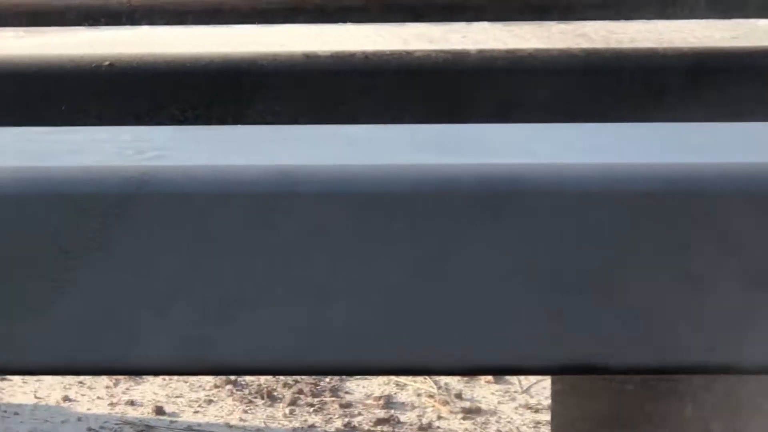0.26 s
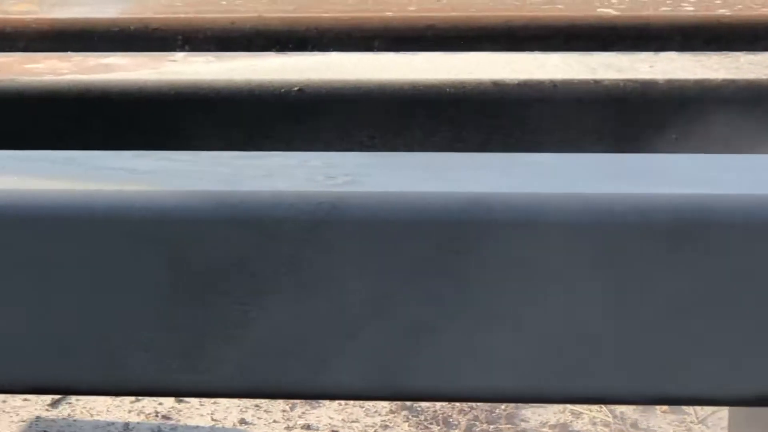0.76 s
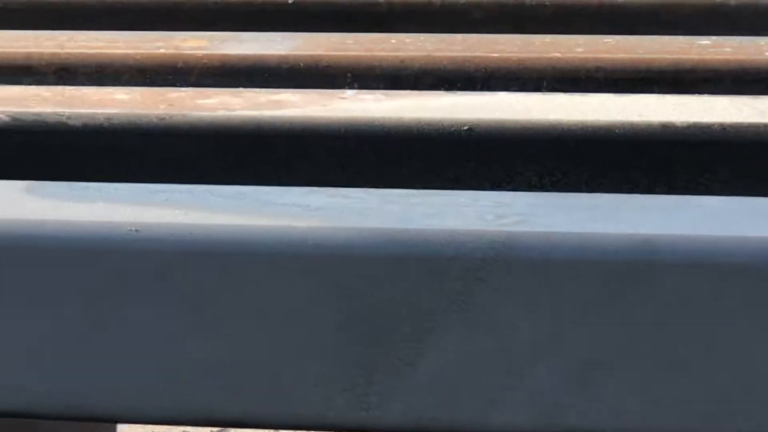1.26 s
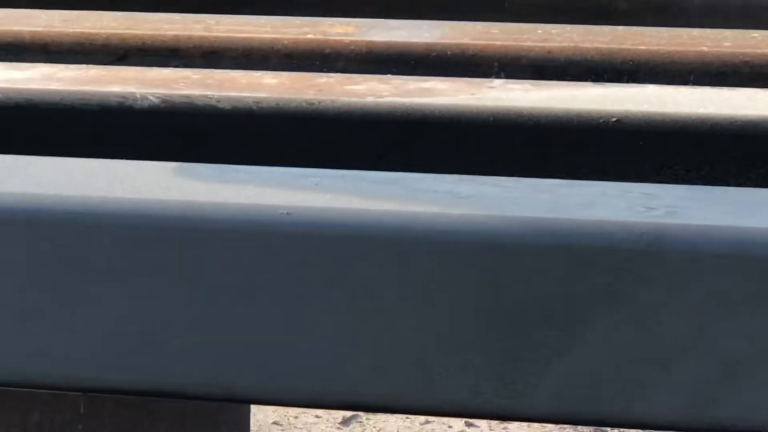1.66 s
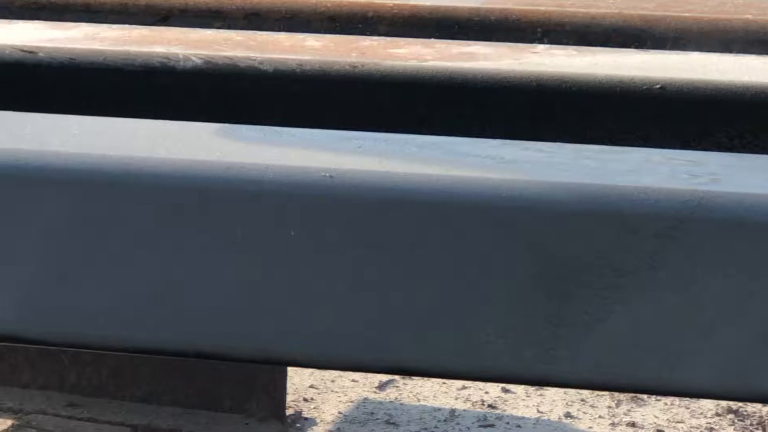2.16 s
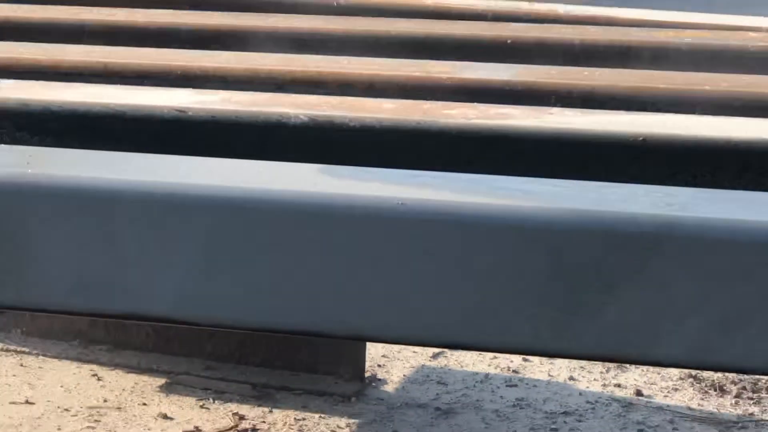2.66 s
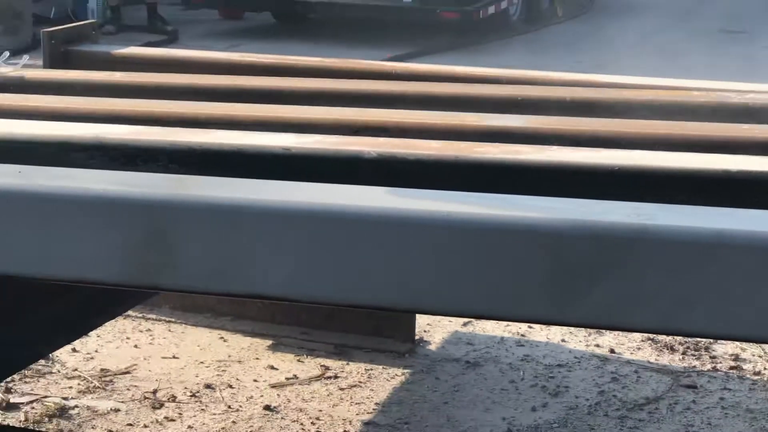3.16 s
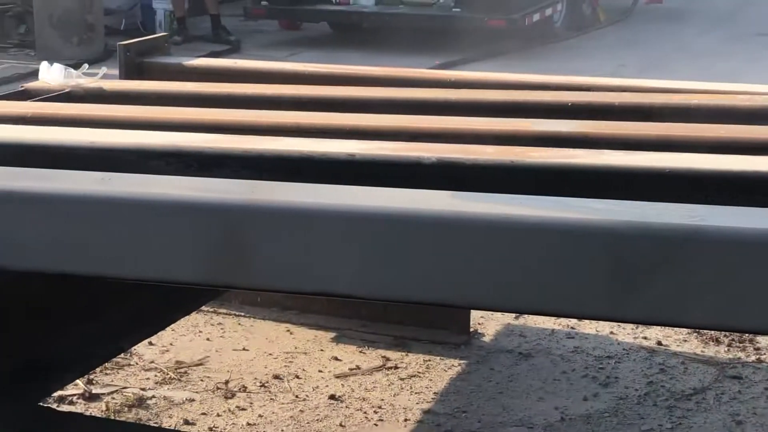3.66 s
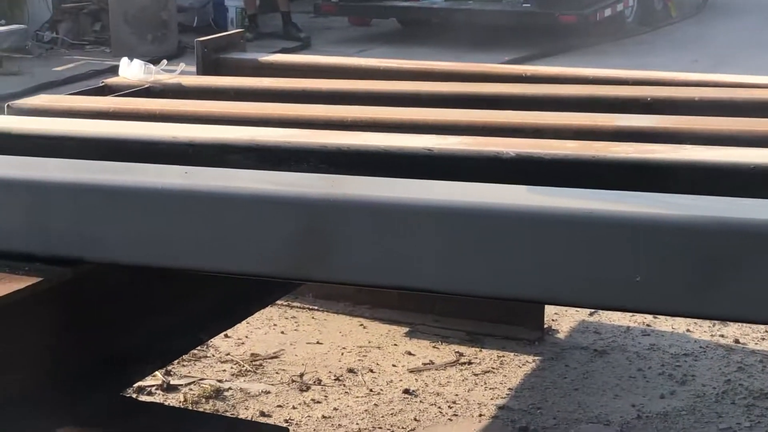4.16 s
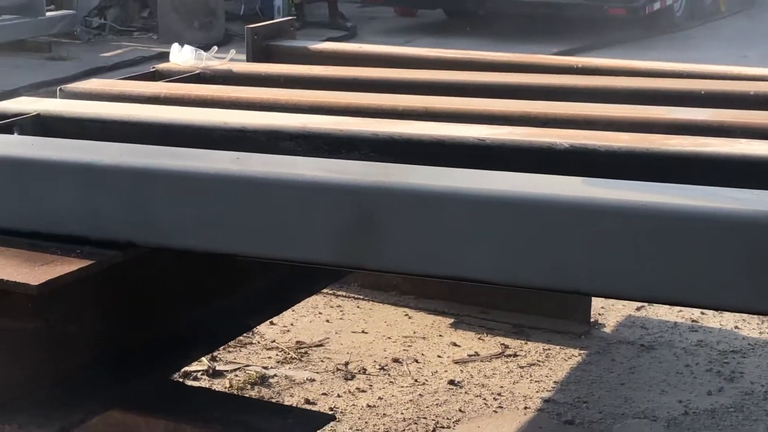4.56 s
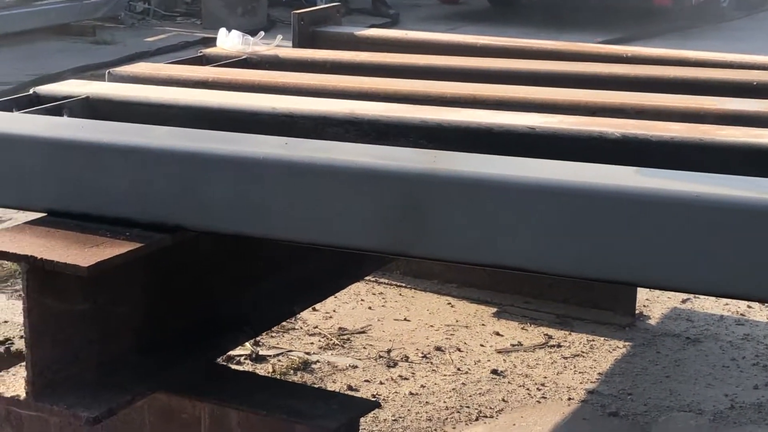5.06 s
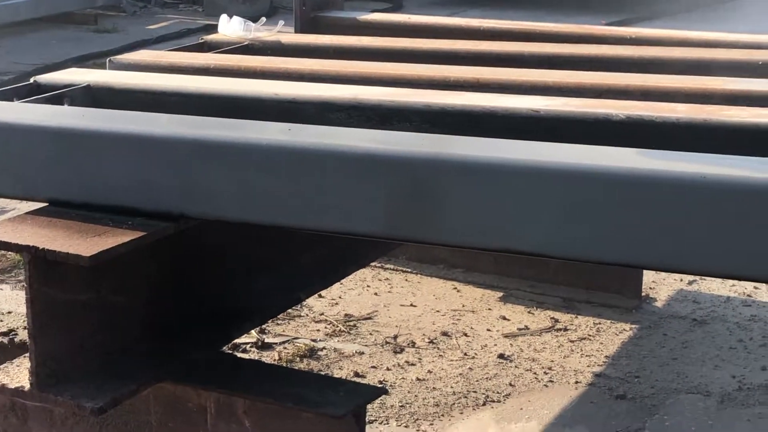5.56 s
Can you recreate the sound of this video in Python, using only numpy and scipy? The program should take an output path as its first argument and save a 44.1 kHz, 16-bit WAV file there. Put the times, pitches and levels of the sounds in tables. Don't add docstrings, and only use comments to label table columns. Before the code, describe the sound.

Continuous abrasive spray on metal, outdoors, heard through one microphone in mono. The harsh white hiss wavers as the jet crosses edges, with short close reflections off the beams and a very faint distant compressor hum. After roughly four seconds the perspective jumps closer: fuller roar, stronger midrange steel ring, less fine top, and irregular bursts of low buffeting from the backwash.

```python
import sys
import numpy as np
from scipy import signal
from scipy.fft import rfft, irfft, next_fast_len
from scipy.io import wavfile
from scipy.ndimage import uniform_filter1d

SR = 44100
rng = np.random.default_rng(int(sys.argv[2]) if len(sys.argv) > 2 else 0)


def generate_wav(sig):
    pcm = np.round(np.clip(np.atleast_2d(sig).T, -1, 1) * 32767).astype(np.int16)
    wavfile.write(sys.argv[1], SR, pcm)


def to_linear_factor(level_db):
    exponent = np.asarray(level_db, float) / 20
    return 10 ** exponent


N = 256214
T_S = np.arange(N) / SR
CUT_S = 4.306
CUT = int(CUT_S * SR)
NEAR = T_S >= CUT_S


def in_time(rows):
    s, *columns = np.transpose(rows)
    return np.array([np.interp(T_S, s, c) for c in columns])


def at_hz(points, hz):
    points_hz, points_db = np.transpose(points)
    return np.interp(np.log(hz), np.log(points_hz), points_db)


def drift(rate_hz):
    r = np.exp(-80 * np.pi * rate_hz / SR)
    slow = signal.lfilter([1], [1, -2 * r, r * r], rng.standard_normal(N // 40 + 2002))[2000:]
    slow = slow - slow.mean()
    slow = slow / np.sqrt(np.mean(slow ** 2) + 1e-20)
    return np.interp(np.arange(N) / 40, np.arange(len(slow)), slow)


def swells(rows):
    return sum(lift_db * np.exp(-((T_S - s) / half_s) ** 4) for s, half_s, lift_db in rows)


def resonance(x, hz, width_hz):
    r = np.exp(-np.pi * width_hz / SR)
    poles = [1, -2 * r * np.cos(2 * np.pi * hz / SR), r * r]
    return signal.lfilter([(1 - r * r) / 2, 0, (r * r - 1) / 2], poles, x)


def band(x, low_hz, high_hz):
    return signal.sosfilt(signal.butter(2, [low_hz, high_hz], "band", fs=SR, output="sos"), x)


def steep(x, low_hz, high_hz):
    size = next_fast_len(N)
    hz = np.fft.rfftfreq(size, 1 / SR) + 1
    above_low, above_high = [np.clip(.5 + 3 * np.log2(hz / edge), 0, 1) for edge in (low_hz, high_hz)]
    return irfft(rfft(x, size) * (above_low - above_high), size)[:N]


def grit():
    return rng.standard_normal((2, N)) * to_linear_factor(0.29 * drift(15) + 0.56 * drift(65))


# (frequency [Hz], density [dB per Hz])
HISS_FAR = [(260, -47), (450, -15.5), (530, -28.5), (904, -5.5), (1110, -14.5), (1250, -7), (1740, -8),
            (2110, -4.5), (2750, -2), (4360, -6), (6040, -7.5), (9850, -6), (15600, -6)]
HISS_NEAR = [(260, -38), (450, -10), (734, -2), (945, 2.5), (1410, -16.5), (1690, 0.5), (1900, -30),
             (2070, 2), (2520, -16), (3190, -1.5), (7110, -4), (8000, -9.5), (15600, -17.5)]


def grit_hiss(streams):
    edges_hz, hiss = np.geomspace(420, 17000, 27), np.zeros(N)
    for k, (low_hz, high_hz) in enumerate(zip(edges_hz, edges_hz[1:])):
        hz = np.sqrt(low_hz * high_hz)
        colour_db = np.where(NEAR, at_hz(HISS_NEAR, hz), at_hz(HISS_FAR, hz))
        patches_db = to_linear_factor(hz / 16000 * 8.2) * 0.67 * drift(16.4)
        hiss += to_linear_factor(colour_db + patches_db) * band(streams[k % 2], low_hz, high_hz)
    return hiss


# (frequency [Hz], width [Hz], level [dB])
MODES_FAR = [(900, 136, -12.5), (1312, 51, -7.5), (2068, 81, -2.5), (2183, 147, -3.5), (2738, 107, -2.5),
             (3586, 320, -6), (4640, 300, -6), (5900, 490, -10.5)]
MODES_NEAR = [(985, 130, -6), (1345, 130, 0), (1707, 140, -3.5), (2107, 200, -2.5), (2720, 98, -2.5),
              (3230, 340, 1), (3910, 240, 3), (4830, 200, 1), (5640, 120, 0.5)]


def ringing_steel(streams):
    ring = np.zeros(N)
    for modes, heard, ring_db in ((MODES_FAR, ~NEAR, 1.0), (MODES_NEAR, NEAR, -1.0)):
        for k, (hz, width_hz, level_db) in enumerate(modes):
            gain = to_linear_factor(level_db + ring_db + 2.1 * drift(11.3))
            ring += heard * gain * resonance(streams[k % 2][::-1], hz, width_hz)
    return ring


# (first lag [ms], last lag [ms], first strength [ratio], last strength [ratio])
BEAM_ECHOES_FAR = [(1.052, 0.965, 0.13, 0.032), (2.06, 1.74, -0.15, 0.15), (0.39, 0.314, -0.041, 0.12),
                   (.25, 0.215, 0.13, -0.31)]
BEAM_ECHOES_NEAR = [(1.05, .95, -0.039, 0.074), (2.15, 1.58, .07, 0.16), (0.524, .57, 0.088, 0.094),
                    (0.346, 0.365, -0.17, -0.074)]


def echoed(x):
    fine, out = signal.resample_poly(x, 4, 1), x.copy()
    for far, near in zip(BEAM_ECHOES_FAR, BEAM_ECHOES_NEAR):
        lag_ms, gain = [np.r_[np.linspace(*far[k:k + 2], CUT), np.linspace(*near[k:k + 2], N - CUT)]
                        for k in (0, 2)]
        out += gain * np.interp(np.arange(N) - lag_ms * SR / 1000, np.arange(len(fine)) / 4, fine)
    return out


def scattered(x, wet_db=-11.5, spread_ms=3.5, count=22):
    t = np.arange(SR // 40) / SR
    paths = rng.standard_normal((count, len(t))) * np.exp(-t * 1000 / spread_ms) * (t > .0012)
    place, out = np.linspace(0, count - 1, N), x.copy()
    for k, path in enumerate(paths):
        share = np.cos(np.pi / 2 * np.clip(place - k, -1, 1))
        live = np.flatnonzero(share > 1e-6)
        wet = signal.fftconvolve(x[live], path / np.sqrt(np.sum(path ** 2)))[:len(live)]
        out[live] += to_linear_factor(wet_db) * share[live] * wet
    return out


# (middle [s], half length [s], frequency [Hz], width [Hz], lift [dB])
EDGE_COLOURS = [(.12, 0.16, 10100, 1700, -4), (0.5, 0.33, 3600, 900, 1.5), (0.33, 0.37, 8000, 900, -9),
                (.66, .4, 2800, 360, -11), (1.45, .3, 14700, 1300, -8), (1.8, 0.24, 8100, 500, 3),
                (2.4, .18, 14400, 900, 4.5), (2.6, 0.48, 1550, 250, 7.5), (2.8, 0.44, 3160, 940, 5.5),
                (2.67, 0.5, 4100, 230, -7), (2.9, 0.49, 13000, 2500, -0.5), (3.4, .4, 11500, 500, -4),
                (3.6, 0.36, 10000, 1300, -6), (4.1, 0.13, 14500, 1500, 2), (3.936, 0.14, 3850, 760, 8),
                (4.9, 0.95, 11670, 600, -2.5), (4.95, 0.62, 1673, 106, 8), (5.05, 0.78, 15900, 1100, 13.5),
                (5.27, .17, 5670, 66, 9.5), (5.35, 0.66, 3230, 230, 5), (5.25, 0.38, 3840, 500, 2.5),
                (5.45, 0.13, 8800, 2000, -6)]


def shaded(x):
    out = x.copy()
    for s, length_s, hz, width_hz, lift_db in EDGE_COLOURS:
        part = slice(max(0, int((s - 2 * length_s) * SR)), min(N, int((s + 2 * length_s) * SR)))
        swell = np.exp(-((T_S[part] - s) / length_s) ** 4)
        swell *= NEAR[part] == (s >= CUT_S)
        out[part] += (to_linear_factor(lift_db * swell) - 1) * resonance(x[part], hz, width_hz)
    return out


# (start [s], end [s], start [Hz], end [Hz], width [Hz], lift [dB])
GLIDES = [
    (.25, 1.6, 11800, 12800, 380, 7),
    (.45, 1.65, 10900, 12000, 380, 5),
    (.7, 1.46, 8500, 9000, 251, 2.5),
    (2.9, 4.3, 8650, 8630, 315, 4),
]


def striped(x):
    out = x.copy()
    for start_s, end_s, start_hz, end_hz, width_hz, lift_db in GLIDES:
        part = slice(int(start_s * SR), int(end_s * SR))
        glide_hz = np.linspace(start_hz, end_hz, len(x[part]))
        turn = np.exp(2j * np.pi * np.cumsum(glide_hz) / SR)
        slow = signal.lfilter(*signal.butter(2, width_hz / 2, fs=SR), x[part] / turn)
        gain = to_linear_factor(lift_db * signal.windows.tukey(len(turn), .5)) - 1
        out[part] += gain * 2 * (slow * turn).real
    return out


# (time [s], force [dB], bite [dB])
FORCE_FAR = [(0, -28, 2.5), (.14, -27, 0), (.44, -22, 1.5), (.6, -21.5, -3), (.72, -22.5, -4.5),
             (1.05, -20, -5.5), (1.45, -21.5, -4.5), (2.05, -19, -3.5), (2.5, -20, -0.3), (2.88, -19, 0.7),
             (3.25, -21.5, -3.5), (3.7, -21.5, 0), (3.93, -19.5, 2.5), (4.08, -17.5, 0.5), (4.3, -20, 1.5)]
FORCE_NEAR = [(4.312, -16, -6), (4.6, -17.5, -3.5), (4.83, -14, -4.5), (4.96, -17, -0.5),
              (5.27, -15.5, -2.5), (5.46, -20, 1.3), (5.61, -15, -4.5), (5.81, -15, -5)]
# (far level [dB], near level [dB], share of force [ratio], share of bite [ratio])
FORCE_LAW = [
    (-14, -8.5, 0.83, 0.52),
    (-0.5, 0.1, 1, 1),
    (-2, -2.5, 1, 0.19),
    (-4.5, -3, 0.76, -0.24),
]
# (middle [s], half length [s], lift [dB])
ROAR_SPILLS = [
    (.76, 0.084, -4),
    (1.0, 0.13, 2.5),
    (2.4, 0.52, 1.5),
    (2.92, 0.12, -3),
    (3.86, .12, -1.5),
    (4.2, 0.14, 5),
    (4.78, 0.12, 2),
    (5.4, 0.41, -2),
]


def zone_levels():
    mean_force_db = -20
    force_db, bite_db = in_time(list(FORCE_FAR) + list(FORCE_NEAR))
    levels_db = []
    for far_db, near_db, of_force, of_bite in FORCE_LAW:
        base_db = mean_force_db + np.where(NEAR, near_db, far_db)
        levels_db.append(base_db + of_force * (force_db - mean_force_db) + of_bite * bite_db)
    in_open = T_S < .575
    levels_db[0] += 8.5 * in_open + swells(ROAR_SPILLS)
    levels_db[1] += 2 * in_open
    return levels_db


# (centre [Hz], low edge [Hz], high edge [Hz])
ZONES = [(1100, 650, 1800), (2900, 1800, 4400), (6200, 4400, 8500), (11500, 8500, 15600)]


def jet():
    streams = grit()
    hiss = grit_hiss(streams) + ringing_steel(streams)
    hiss = striped(shaded(scattered(echoed(hiss))))
    edges_hz = [(300, ZONES[0][2])] + [z[1:] for z in ZONES[1:-1]] + [(ZONES[-1][1], 19000)]
    out = np.zeros(N)
    for (_, low_hz, high_hz), level_db, (open_low_hz, open_high_hz) in zip(ZONES, zone_levels(), edges_hz):
        zone = steep(hiss, open_low_hz, open_high_hz)
        parts = np.split(steep(zone, low_hz, high_hz) ** 2, [CUT])
        power = np.concatenate([uniform_filter1d(p, size=SR // 6) for p in parts])
        out += to_linear_factor(level_db) * zone / np.sqrt(power + 1e-12)
    return out


# (frequency [Hz], density [dB per Hz])
RUMBLE = [(16, -49), (28, -27), (49, -13), (102, -4.5), (151, -2.5), (194, -3), (242, -3.5), (284, -4),
          (360, 4), (513, -27), (650, 1), (840, -40), (1430, -120)]
# (middle [s], half length [s], lift [dB])
GROUND_SURGES = [
    (1.13, 0.091, 1.5),
    (1.65, 0.17, 3),
    (2.5, .12, 1),
    (3.28, .1, 2),
    (4.19, 0.15, 5.5),
    (4.75, .1, 3.5),
    (5.58, 0.17, 9),
]


def yard_rumble():
    white, edges_hz, rumble = rng.standard_normal((2, N)), np.geomspace(25, 700, 13), np.zeros(N)
    for k, (low_hz, high_hz) in enumerate(zip(edges_hz, edges_hz[1:])):
        colour_db = at_hz(RUMBLE, np.sqrt(low_hz * high_hz)) - NEAR * (low_hz < 200) * 2.8
        rumble += to_linear_factor(colour_db + 1.24 * drift(6.4)) * band(white[k % 2], low_hz, high_hz)
    level_db = -44 + swells(GROUND_SURGES)
    return rumble / np.std(band(rumble, 250.5, 450.5)) * to_linear_factor(level_db)


# (frequency [Hz], level [dB rms])
ENGINE_TONES = [(65, -55), (118, -56), (153, -46.5), (197, -54), (235, -46)]


def compressor():
    tones = np.zeros(N)
    for hz, level_db in ENGINE_TONES:
        gain = to_linear_factor(level_db + 2 + 0.93 * drift(3.5))
        tones += gain * np.sin(2 * np.pi * hz * T_S + 0.44 * drift(8.0))
    return tones * to_linear_factor(-8 * NEAR)


# (time [s], peak [dB], late thump [dB], early snap [dB])
GUSTS = [(4.315, -22.5, -8, -10), (4.351, -20, -10, -11), (4.382, -23, -12, -11), (4.445, -12, -11, -7.5),
         (4.454, -9, -14, -19), (4.486, -13.5, -18, -7.5), (4.533, -19.5, -11, -4), (4.568, -27, -5, -10),
         (4.598, -15.5, -13, -9), (4.858, -24, -11, -5), (4.883, -21.5, -13, -9), (4.976, -8, -14, -11),
         (4.988, -17, -21, -7), (5.014, -25, -10, -8), (5.065, -20, -7, -11), (5.099, -19, -10, -15),
         (5.179, -30, -13, -14), (5.298, -20.5, -14, -8), (5.347, -28, -9, -21), (5.445, -20.5, -22, -9),
         (5.636, -9.5, -23, -7), (5.659, -8.5, -16, -11), (5.675, -15, -20, -4), (5.684, -29, -11, -12),
         (5.72, -23.5, -12, -7), (5.74, -17, -8.5, -18), (5.789, -28, -14, 5)]


def buffets(turns=1.184, start_s=0.00084, fade_s=0.012, rough=0.22):
    out, t = np.zeros(N + SR), np.arange(SR // 10) / SR
    chance, sweep = rng.random((len(GUSTS), 2)), np.log(1 + t / start_s)
    eddies = np.pad(drift(74), (0, SR))
    envelope = (1 - np.exp(-t / 0.00052)) * np.exp(-(t / (2 * fade_s)) ** 2)
    for (s, peak_db, thump_db, snap_db), (stretch, flip) in zip(GUSTS, chance):
        tilt_db = np.interp(sweep, [.6, 2.6], [snap_db + 10.5, thump_db + 6.0])
        at = round((s + 0.0028) * SR)
        wobble = rough * np.minimum(t / 0.0083, 1) * eddies[at:at + len(t)]
        cycles = turns * (0.676 + 0.28 * stretch) * sweep + flip
        out[at:at + len(t)] += to_linear_factor(peak_db + tilt_db) * envelope * np.sin(2 * np.pi * cycles + wobble * 2)
    return out[:N]


def scene():
    return np.tile(jet() + yard_rumble() + compressor() + buffets(), (2, 1))


def band_limit(x):
    return signal.sosfilt(signal.butter(12, 17100, fs=SR, output="sos"), x)


def record(dry):
    low_cut = signal.sosfilt(signal.butter(2, 55, "high", fs=SR, output="sos"), dry)
    size, top_hz = next_fast_len(N), 15730
    rounded = rfft(1.172 * np.tanh(low_cut / 1.119), size)
    mix = irfft(rounded * (np.fft.rfftfreq(size, 1 / SR) < top_hz), size)[:, :N]
    return band_limit(mix)


dry = scene()
out = record(dry)
generate_wav(out)
```